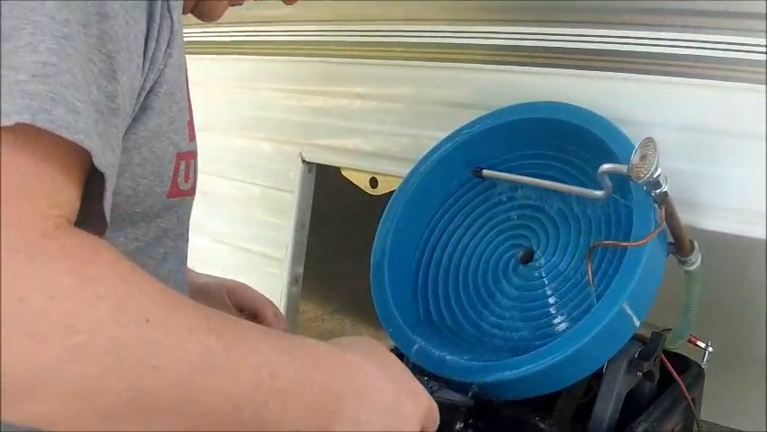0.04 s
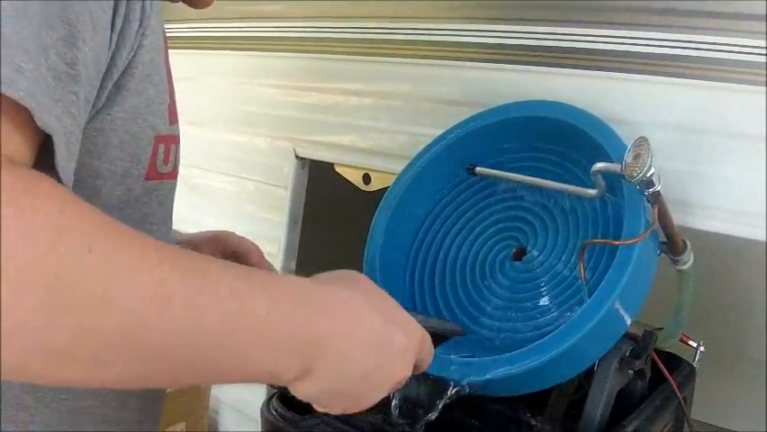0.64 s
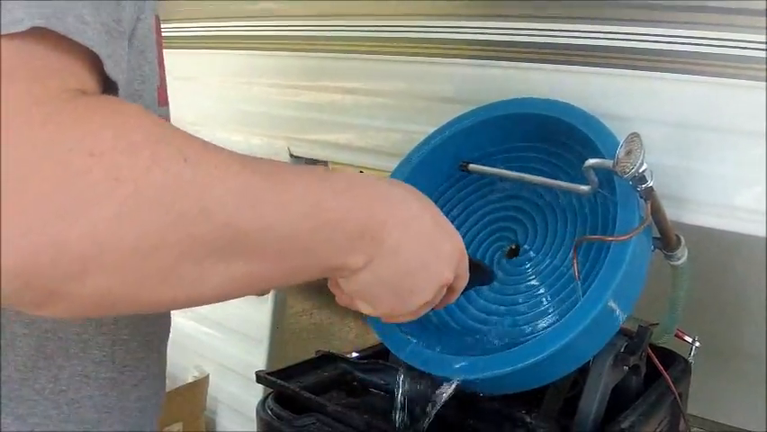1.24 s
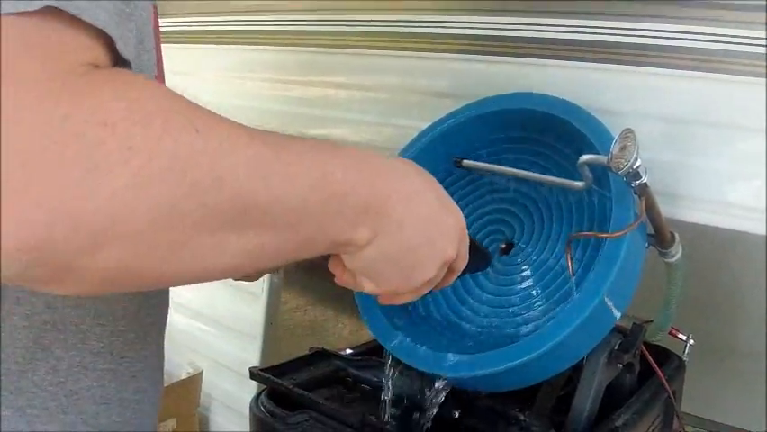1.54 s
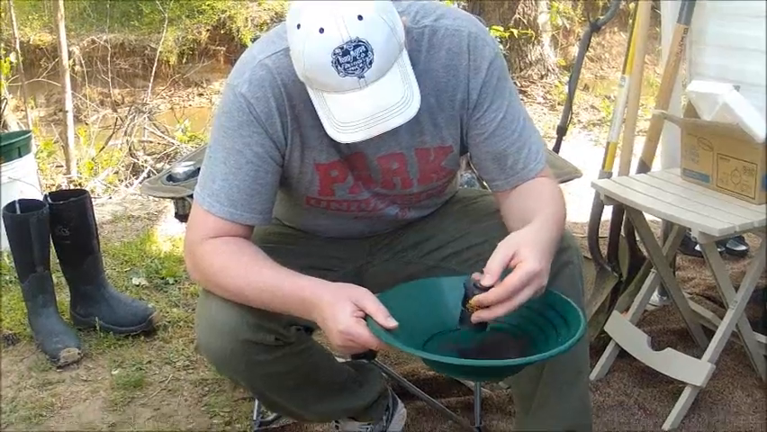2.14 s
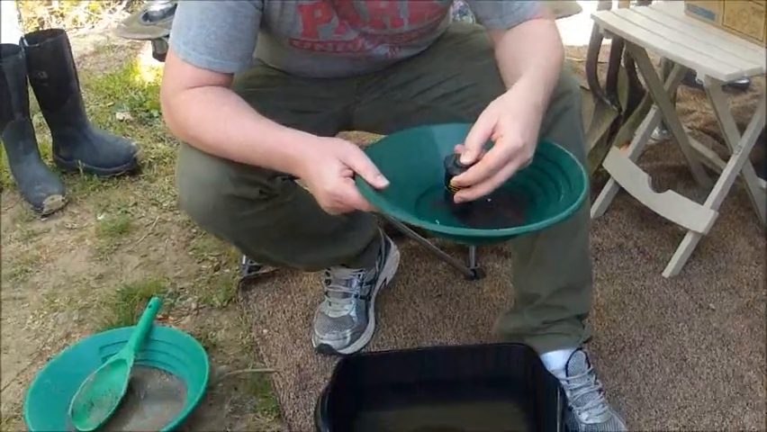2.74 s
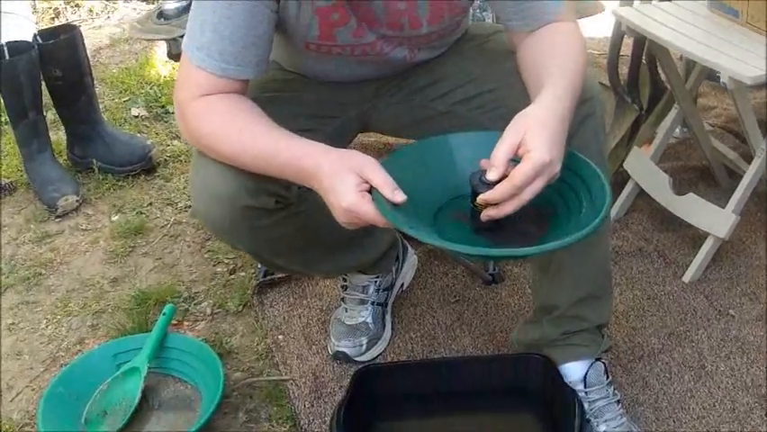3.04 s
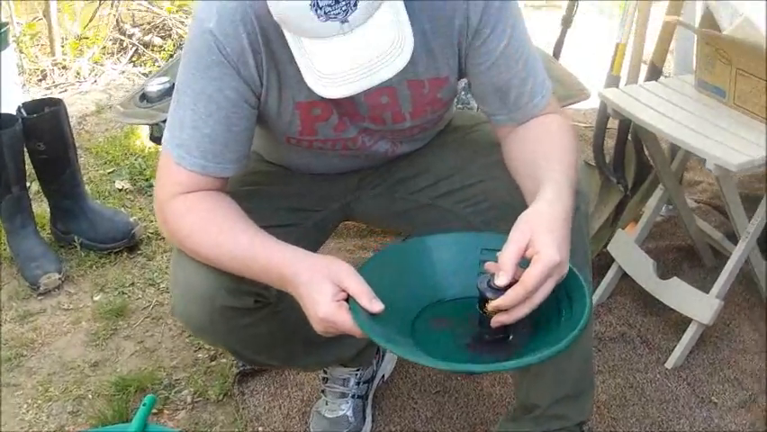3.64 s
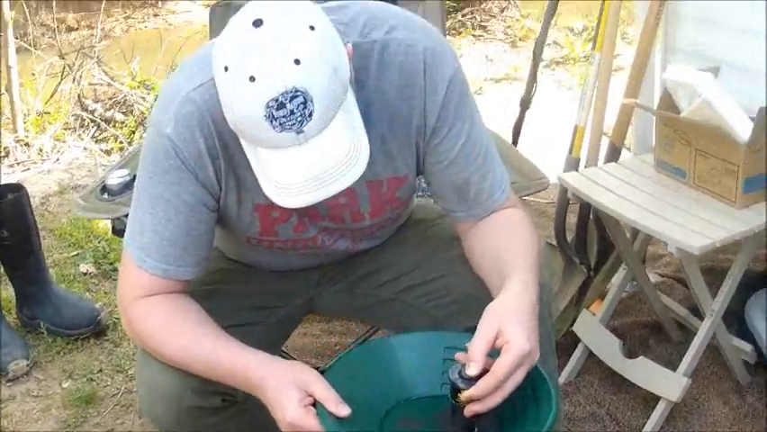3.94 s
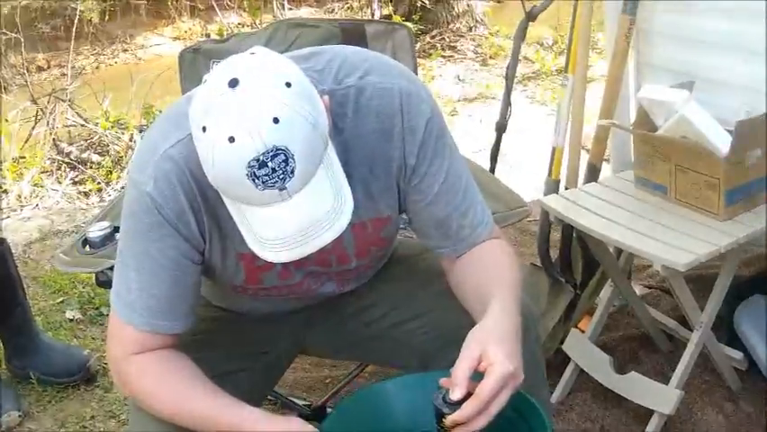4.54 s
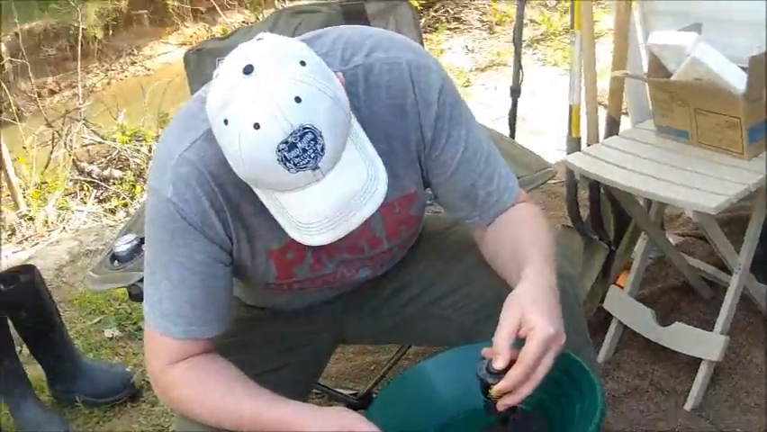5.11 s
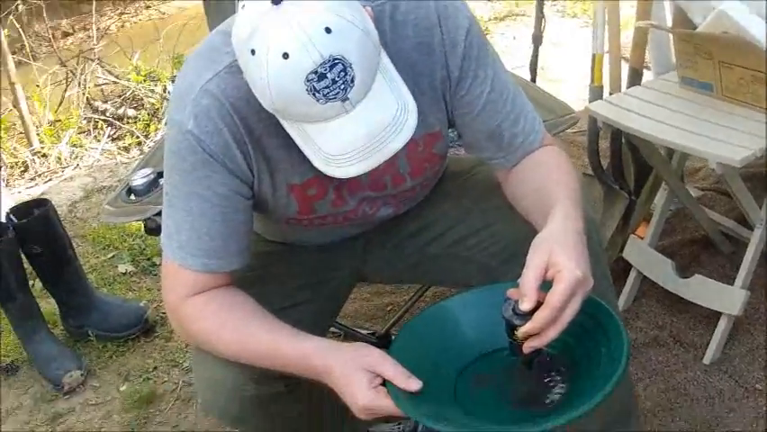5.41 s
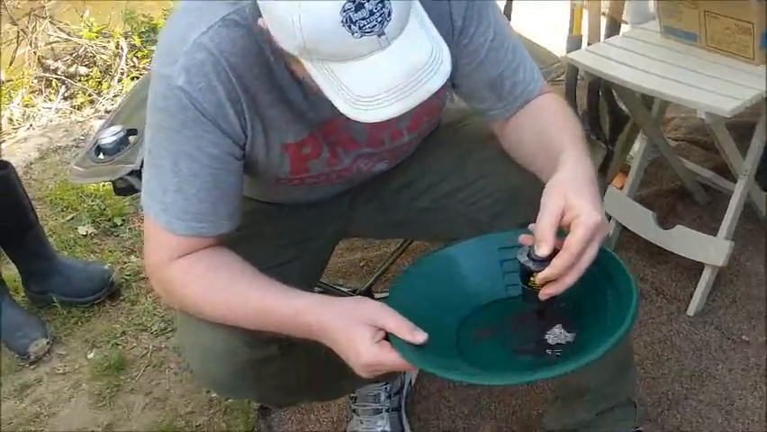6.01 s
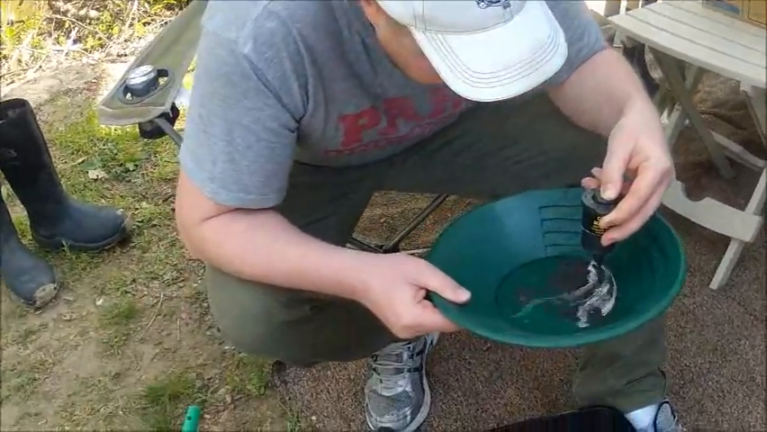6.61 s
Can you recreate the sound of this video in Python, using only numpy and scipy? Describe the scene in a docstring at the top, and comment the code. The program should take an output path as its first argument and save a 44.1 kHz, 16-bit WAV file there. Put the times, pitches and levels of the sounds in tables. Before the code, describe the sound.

Outdoors, a soft hiss of air runs under a faint, dripping trickle of water and a small tap. Once the water stops, there is handling noise very close to the microphone: light finger brushes on hollow plastic, then a quick slide into a sharp click with a low thump. A longer, stuttering rub follows with small ticks, dull thuds and a low rumble, fading to faint squeaks.

```python
"""Water trickles faintly off a wheel beside a gold pan, in steady outdoor air, with one light tap. The trickle
stops and fingers shift on a hollow plastic casing right at the microphone: light brushes, a slide that ends in
one sharp snap with rebounds, then a long drag in which the skin sticks and slips with soft low thuds. The
casing's resonances colour the friction; a hand rumble, deep buffets of air, a deep push under the snap and the
first slip, and a few faint squeaks sit underneath."""
import sys
import numpy as np
from scipy import signal
from scipy.fft import rfft, irfft, next_fast_len
from scipy.io import wavfile

SR = 44100
rng = np.random.default_rng(int(sys.argv[2]) if len(sys.argv) > 2 else 0)


def generate_wav(sig):
    """Save sig (samples, or channels by samples) to the path in sys.argv[1] as 16-bit PCM at SR."""
    pcm = np.round(np.clip(np.atleast_2d(sig).T, -1, 1) * 32767).astype(np.int16)
    wavfile.write(sys.argv[1], SR, pcm)


N = 298320

# drips that stand out of the trickle: t/s, level/dB before trim, starting f/Hz
WATER_DRIPS = [(0.0762, -53, 3220), (0.3292, -59, 5900), (0.3564, -55, 4280), (0.4723, -55, 3780),
               (0.8854, -67, 3770), (1.0204, -59, 4390), (1.1508, -58.5, 3560), (1.2764, -58, 4690),
               (1.3344, -63, 4110)]
# tone of the air bed: f/Hz, relative level/dB
AIR_SPECTRUM = [(15, -7), (30, 2), (70, 1.5), (110, -1), (200, -0.5), (300, -5.5), (420, -10.5), (700, -16),
                (1100, -18.5), (1800, -21), (3400, -23), (5000, -29.5), (9000, -32), (11500, -38),
                (15300, -37)]
# narrow peaks and a dip in the air bed: f/Hz, width/Hz, gain/dB
AIR_COLOUR = [(2200, 260, 4), (6010, 450, -10), (9750, 400, 4.5), (14300, 400, 4.5)]
# modes of the tap at the wheel: f/Hz, level/dB, t60/s
TAP_MODES = [(1180, -45.5, 0.025), (1330, -41, .02), (3100, -50, .016), (9000, -56.5, .014),
             (10700, -55.5, .014), (13400, -56.5, 0.013)]
# deep lumpy swells: buffets of air, plus the low push under the snap (3.635 s) and under the first slip (4.23
# s): crest t/s, level/dB, rise/s, fall/s
DEEP_SWELLS = [(2.6, -57.5, 0.65, 0.65), (3.635, -46.5, .07, 0.082), (4.23, -53, .1, 0.082),
               (4.9, -57.5, 1.2, 0.82), (5.78, -53.5, 0.39, 0.52), (6.42, -56, .4, 0.28)]
# resonances of the casing: f/Hz, width/Hz, relative level/dB when brushed, under a slide, under a drag
CASING_MODES = [(788, 75, 1.5, -12.5, -13), (900, 170, -2, -13.5, -4.5), (1231, 180, 0.5, -7, 2),
                (1540, 210, -8, -49, -2.5), (1625, 110, -6, -0.5, 1.5), (1914, 240, -1, -4, -4.5),
                (2260, 180, -7.5, -4, -13), (2314, 170, -1.5, -47, -3.5), (2990, 92, -18, -11, -15),
                (3224, 450, -9.5, -17, -16), (3470, 260, -29, -31, -14), (3770, 150, -5, -25, -45),
                (3890, 450, -29.5, -25, -21), (5280, 120, -25, -28.5, -15.5),
                (5440, 350, -26, -34.5, -23.5), (6603, 380, -29, -35, -23.5), (6700, 91, -26, -31, -18),
                (8350, 540, -16.5, -28, -23), (8550, 130, -18.5, -25, -24.5), (8750, 270, -19, -22, -21.5),
                (9780, 320, -13, -19, -16.5), (10260, 220, -16.5, -14, -14), (10750, 230, -17, -30.5, -16),
                (11660, 110, -20, -32, -22.5), (12220, 100, -21, -34, -31), (13240, 400, -19.5, -32.5, -18),
                (14200, 570, -17.5, -16.5, -18), (14800, 280, -23, -26, -38)]
BRUSHED, SLID, DRAGGED = 0, 1, 2  # picks one of the three level columns
# light finger brushes: crest t/s, level/dB, rise/s, fall/s
BRUSH_STROKES = [(2.135, -56.5, 0.048, .06), (2.22, -48, 0.063, 0.054), (2.28, -54, 0.079, 0.15),
                 (2.403, -62.5, 0.0073, 0.11), (2.529, -50, 0.0064, 0.031), (2.655, -58.5, .06, 0.081),
                 (2.745, -51, 0.005, .04), (2.78, -61.5, 0.034, 0.15), (2.845, -56.5, .004, 0.044),
                 (2.925, -63, 0.045, 0.15), (2.972, -52.5, 0.0064, 0.037), (3.015, -59.5, .05, 0.067),
                 (3.418, -50.5, .003, 0.047)]
# tone of the hand's rumble: f/Hz, relative level/dB
GRIP_SPECTRUM = [(25, -7), (70, -4), (130, -2), (195, 1.5), (270, -5.5), (370, -15), (480, -26.5),
                 (650, -24), (900, -55)]
# ticks and catches on the plastic: t/s, level/dB, f/Hz, scuff/dB relative to the tone, t60/s
PLASTIC_TICKS = [(2.233, -43.5, 1730, -5, .018), (4.692, -39, 1430, -6, 0.0096),
                 (4.854, -43, 2140, -7, 0.065), (5.049, -31.5, 1940, -5, 0.014)]
# faint low squeaks: t/s, length/s, start f/Hz, end f/Hz, level/dB
LOW_SQUEAKS = [(2.62, 0.035, 190, 170, -43.5), (5.395, 0.059, 187, 155, -46),
               (5.546, 0.11, 218, 230.6, -44.5), (6.304, 0.13, 304, 324.6, -57),
               (6.419, 0.055, 420, 400, -59)]
# the slide into the snap and its run-out: crest t/s, level/dB, rise/s, fall/s
SLIDE_STROKES = [(3.5, -42.5, .062, .08), (3.553, -41.5, .05, .115), (3.66, -48.5, .03, .04)]
# the snap and its rebounds: t/s, ring gain/dB, crack level/dB
SNAP_HITS = [(3.6281, -1.5, -19.5), (3.6351, -29.5, -51), (3.6425, -25, -54.5), (3.6552, -23, -27.5),
             (3.6676, -44.5, -48.5)]
# modes the snap rings: f/Hz, relative level/dB, t60/s before the choke
SNAP_MODES = [(255, -24.5, .024), (408, -26, 0.0072), (1235, -9.5, 0.018), (1904, 1, .019),
              (2188, -11, 0.041), (3052, -2.5, .013), (3693, -18, 0.014), (5270, -15, .009),
              (6740, -15.5, .009), (8940, -10, .012), (9790, -19.5, 0.021), (10110, -11.5, .016),
              (10780, -27, 0.012), (13000, -32.5, .016), (13880, -12.5, 0.013), (15200, -18, .016),
              (16000, -9.5, .012)]
# short drags: crest t/s, level/dB, rise/s, fall/s
DRAG_STROKES = [(3.985, -71, .05, 0.18), (4.185, -59, 0.13, .045), (4.28, -46, 0.063, 0.044),
                (4.362, -43.5, 0.036, 0.086), (4.415, -43.5, 0.037, 0.045), (5.595, -48.5, 0.16, 0.085)]
# friction envelope of the long drag: t/s, level/dB
DRAG_ENVELOPE = [(4.45, -57), (4.628, -46.5), (4.7, -51.5), (4.85, -45.5), (4.856, -40.5), (4.886, -43),
                 (5.068, -43), (5.076, -46.5), (5.214, -44.5), (5.344, -50), (5.446, -63.5), (5.47, -69)]
# the skin lets go, once or in a quick run: t/s, count, gap/s, first level/dB, change per slip/dB
SKIN_SLIPS = [(4.2235, 1, 0, -28.5, 0), (4.4955, 5, 0.015, -34, 1), (4.5821, 5, 0.012, -33.5, 0.4),
              (4.6949, 2, .0283, -31, -3), (4.766, 3, 0.028, -28.5, -3), (4.8643, 4, 0.016, -29.5, 0),
              (4.9544, 1, 0, -32, 0), (5.0247, 2, .0236, -27.5, 2.5), (5.1267, 4, 0.021, -31.5, -2),
              (5.4013, 1, 0, -40, 0), (5.594, 1, 0, -32, 0)]


def amp(db):
    """Decibels to gain."""
    return np.exp(np.asarray(db) * (np.log(10) / 20))


def unit(x):
    """Scaled to rms 1."""
    return x / np.sqrt(np.mean(x ** 2) + 1e-20)


def add(track, start_s, sound):
    """Mix a sound into a track."""
    part = track[round(start_s * SR):][:len(sound)]
    part += sound[:len(part)]


def envelope(points):
    """Gain through (t/s, level/dB) points, silent outside them."""
    times, db = np.transpose(points)
    out = np.zeros(N)
    add(out, times[0], amp(np.interp(np.arange(times[0], times[-1], 1 / SR), times, db)))
    return out


def swells(rows, depth_db=20, roundness=1.6):
    """Gain of swells summed in power; each is depth_db down one rise before and one fall after its crest."""
    t, power = np.arange(N) / SR, np.zeros(N)
    for crest, db, rise, fall in rows:
        away = np.maximum((crest - t) / rise, (t - crest) / fall)
        near = away < 4
        power[near] += amp(db - depth_db * away[near] ** roundness) ** 2
    return np.sqrt(power)


def wobble(rate):
    """Random modulation, rate knots a second."""
    at = np.arange(N) * (rate / SR)
    knots = rng.standard_normal(int(at[-1]) + 2)
    return np.interp(at, np.arange(len(knots)), knots)


def filtered(x, gain):
    """Equalise x with the curve gain(hz)."""
    size, hz = next_fast_len(N + 4096, real=True), np.linspace(0, SR / 2, 4097)
    curve = np.interp(np.fft.rfftfreq(size, 1 / SR), hz, gain(hz))
    return irfft(rfft(x, size) * curve, size)[..., :N]


def noise(spectrum, bands=()):
    """Noise of rms 1, shaped by (f/Hz, level/dB) points and (f/Hz, width/Hz, gain/dB) bands."""
    def gain(hz):
        points_hz, points_db = np.transpose(spectrum)
        broad = np.interp(np.log(hz + 1), np.log(points_hz + 1), points_db)
        narrow = sum(db * np.exp(-((hz - centre) / width) ** 2) for centre, width, db in bands)
        return amp(broad + narrow)
    return unit(filtered(rng.standard_normal(N), gain))


def ringing(modes, t, attack_s):
    """Damped modes, set going by a contact of finite length."""
    ring = sum(amp(db - 60 * t / t60) * np.sin(2 * np.pi * hz * t) for hz, db, t60 in modes)
    return ring * (1 - np.exp(-(t / attack_s) ** 2))


def trickle(end_s=1.7, count=130, trim_db=-4, t60=0.034, splash_db=-5):
    """Water runs off a wheel into a tub: bubbles chirp upward, each with a splash, over a soft wash."""
    tones, splashes, t = np.zeros(N), np.zeros(N), np.arange(SR // 20) / SR
    small_bubbles = [(end_s * when, -70 - 2.5 * np.log(1 - 0.95 * strength), 2800 * 3 ** pitch)
                     for when, strength, pitch in rng.random((count, 3))]
    for start, db, hz in list(WATER_DRIPS) + small_bubbles:
        fade = amp(db + trim_db - 60 * t / t60) * (1 - np.exp(-t / 0.00077))
        add(tones, start, fade * np.sin(2 * np.pi * hz * t * (1 + 1.2 * t)))
        add(splashes, start, fade * amp(splash_db))
    colour = [(500, -15), (1700, -11.5), (3100, -2), (4500, -8), (9500, -12), (11500, -29), (15000, -17)]
    wash = amp(-71) * noise(colour, bands=[(2134, 260, 16.3), (9750, 230, 5.6), (14200, 300, 12)])
    spray = noise([(1500, -30), (4000, 7), (8000, 0), (12000, -7)])
    return tones + splashes * spray + wash * (np.arange(N) < end_s * SR)


def air(lumpy_db=2.5):
    """A steady bed of outdoor air, with a deep, lumpy buffet now and then and a deep push under the snap and
    the first slip."""
    bed = amp(-59.5 + 0.36 * wobble(3.5)) * noise(AIR_SPECTRUM, AIR_COLOUR)
    deep = noise([(12, -25), (31, 3), (50, -11), (110, -34), (400, -89.5)])
    lumps = amp(lumpy_db * wobble(11))
    return bed + swells(DEEP_SWELLS) * unit(deep * lumps)


def side_hiss():
    """A faint hiss that gives the air some stereo width."""
    return amp(-79.5) * noise([(25, 2), (130, -1), (320, -2.5), (700, -12.5), (4800, -14.5),
                               (6000, -25), (7500, -18.5), (9000, -24), (10000, -51)])


def tap(start_s=1.2388):
    """One hard little tap rings briefly at the wheel."""
    out = np.zeros(N)
    add(out, start_s, ringing(TAP_MODES, np.arange(SR // 20) / SR, attack_s=0.00039))
    return out


def casing(hz, contact):
    """Gain of the hollow casing's resonances; the place of contact sets their balance."""
    return np.sqrt(sum(amp(levels[contact]) ** 2 / (1 + ((hz - centre) / width) ** 2) ** 3
                       for centre, width, *levels in CASING_MODES))


def through_casing(force, contact):
    """A force heard through the casing, at rms 1."""
    return unit(filtered(force, lambda hz: casing(hz, contact)))


def rub(contact, catches_per_s, grit, flutter_db):
    """Skin on plastic: a fine hiss and tiny catches excite the casing."""
    catches = (rng.random(N) < catches_per_s / SR) * rng.standard_normal(N)
    force = rng.standard_normal(N) + grit * unit(catches)
    return through_casing(force * amp(flutter_db * wobble(90)), contact)


def grip(pressure, level_db=-53, at_pressure_db=-50, db_per_db=0.46, lag_s=0.016, flutter_db=3):
    """The hand shakes the casing: a low rumble that follows the pressure and settles after it."""
    pole = np.exp(-1 / (lag_s * SR))
    effort = signal.lfilter([1 - pole], [1, -pole], (pressure / amp(at_pressure_db)) ** 2 + 1e-20)
    rumble = unit(noise(GRIP_SPECTRUM) * amp(flutter_db * wobble(55)))
    return amp(level_db) * effort ** (db_per_db / 2) * rumble


def fingers():
    """Fingers brush, slide and drag on the casing, with the hand's rumble for weight."""
    brush, slide = swells(BRUSH_STROKES), swells(SLIDE_STROKES)
    drag = np.hypot(swells(DRAG_STROKES), envelope(DRAG_ENVELOPE))
    pressure = amp(6) * brush + amp(5) * slide + amp(-0.5) * drag
    return (brush * rub(BRUSHED, catches_per_s=600, grit=0.63, flutter_db=2.2)
            + slide * rub(SLID, catches_per_s=2500, grit=0.7, flutter_db=0.5)
            + drag * rub(DRAGGED, catches_per_s=1100, grit=0.71, flutter_db=1.16)
            + grip(pressure))


def ticks():
    """Light taps and catches on plastic: one short mode and a dry scuff each."""
    tones, scuffs, t = np.zeros(N), np.zeros(N), np.arange(SR // 12) / SR
    for start, db, hz, scuff_db, t60 in PLASTIC_TICKS:
        fade = amp(db - 60 * t / t60)
        add(tones, start, fade * np.sin(2 * np.pi * hz * t))
        add(scuffs, start, fade * amp(scuff_db))
    return tones + scuffs * through_casing(rng.standard_normal(N), BRUSHED)


def squeaks(waver=0.039, overtone_db=-19):
    """Faint low tones that swell, glide and fade."""
    out, drift = np.zeros(N), 1 + waver * wobble(55)
    for start, length, start_hz, end_hz, db in LOW_SQUEAKS:
        progress = np.linspace(0, 1, int(length * SR))
        glide = start_hz + (end_hz - start_hz) * progress
        phase = 2 * np.pi * np.cumsum(glide * drift[round(start * SR):][:len(glide)]) / SR
        tone = np.sin(phase) + amp(overtone_db) * np.sin(2 * phase)
        add(out, start, amp(db) * np.sin(np.pi * progress) * tone)
    return out


def snaps(attack_s=0.00053, crack_t60=0.017, choke_s=0.0094, choke_floor=0.1):
    """A plastic part snaps home and rebounds; the contact quickly chokes its ring."""
    rings, cracks, t = np.zeros(N), np.zeros(N), np.arange(SR // 12) / SR
    choke = choke_floor + (1 - choke_floor) / (1 + (t / choke_s) ** 8)
    ring = ringing(SNAP_MODES, t, attack_s) * choke
    for start, ring_db, crack_db in SNAP_HITS:
        add(rings, start, amp(ring_db) * ring)
        add(cracks, start, amp(crack_db - 60 * t / crack_t60) * (1 - np.exp(-t / attack_s)))
    bright = filtered(rng.standard_normal(N), lambda hz: casing(hz, BRUSHED) * hz / (hz + 1500))
    return rings + cracks * unit(bright)


def low_thump(db=-23, hz=125, t60=0.03):
    """One low thump under the hardest snap, a little louder on the left."""
    out, t = np.zeros(N), np.arange(SR // 10) / SR
    start = max(SNAP_HITS, key=lambda hit: hit[1])[0]
    add(out, start, amp(db - 60 * t / t60) * np.sin(2 * np.pi * hz * t))
    return out * amp([[1.5], [-2.2]])


def slips(thud_hz=179, scatter=0.14, push_cycles=0.39, ring_hz=205, ring_db=-7, t60=0.044, scuff_db=-20):
    """Each slip of the skin is one soft push with a scuff; the casing swings briefly after it."""
    thuds, scuffs = np.zeros(N), np.zeros(N)
    t = np.arange(-SR // 100, SR // 16) / SR  # zero at the peak of the push
    decay = amp(ring_db - 60 * np.maximum(t, 0) / t60) * (t > 0)
    for first_s, count, gap, first_db, change_db in SKIN_SLIPS:
        for k in range(round(count)):
            start, db = first_s + k * gap + t[0], first_db + k * change_db
            detune = np.exp(scatter * rng.standard_normal())
            hz = thud_hz * detune
            push = np.exp(-(t * hz / push_cycles) ** 2)
            swing = np.cos(2 * np.pi * ring_hz * detune * t) * decay * (1 - push)
            add(thuds, start, amp(db) * (push * np.cos(2 * np.pi * hz * t) + swing))
            add(scuffs, start, amp(db + scuff_db) * push)
    return thuds + scuffs * through_casing(rng.standard_normal(N), DRAGGED)


def scene():
    """The mix: everything sits in the centre but the wide hiss and the low thump."""
    mid = fingers() + slips() + snaps() + ticks() + tap() + trickle() + squeaks() + air()
    side = side_hiss()
    return np.array([mid + side, mid - side]) + low_thump()


def record(dry, ceiling=0.8, cutoff_hz=15400):
    """A soft clip rounds off the highest peaks, then a steep low-pass trims the top."""
    rounded = dry / (1 + np.abs(dry / ceiling) ** 6) ** (1 / 6)
    return filtered(rounded, lambda hz: 1 / np.sqrt(1 + (hz / cutoff_hz) ** 120))


dry = scene()
out = record(dry)
generate_wav(out)
```